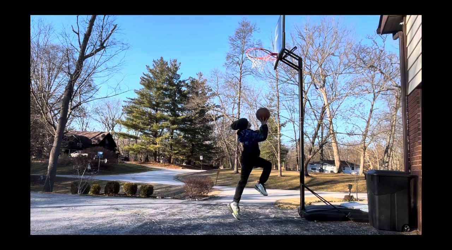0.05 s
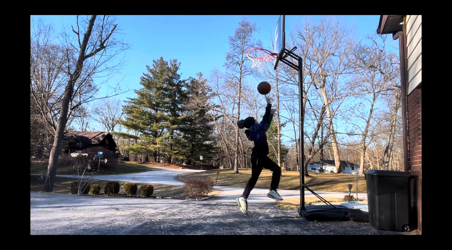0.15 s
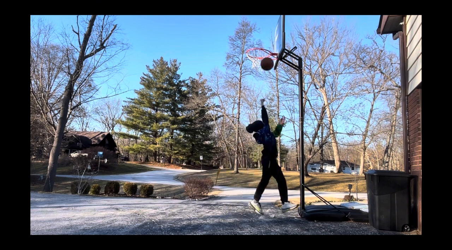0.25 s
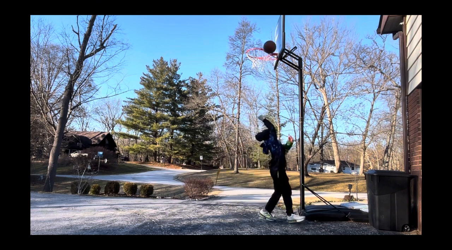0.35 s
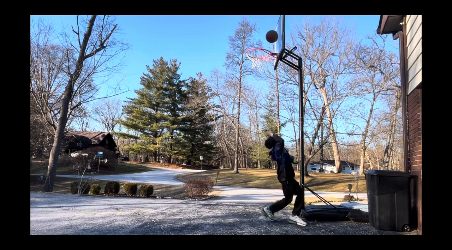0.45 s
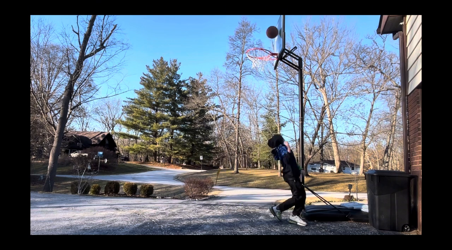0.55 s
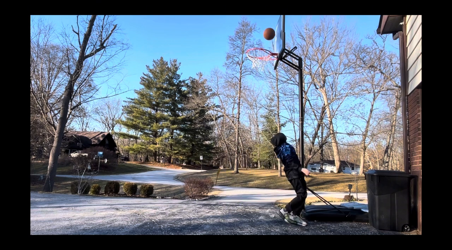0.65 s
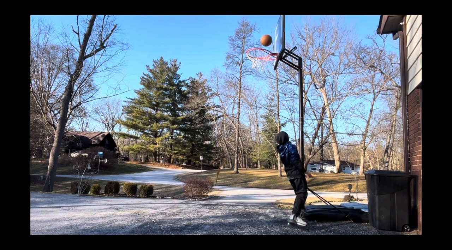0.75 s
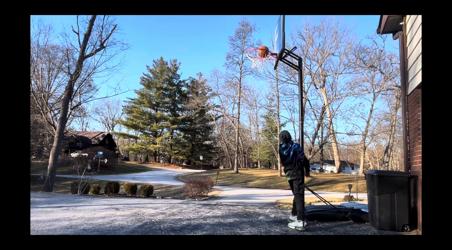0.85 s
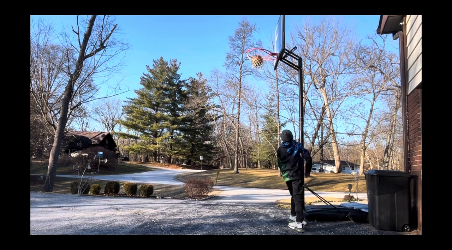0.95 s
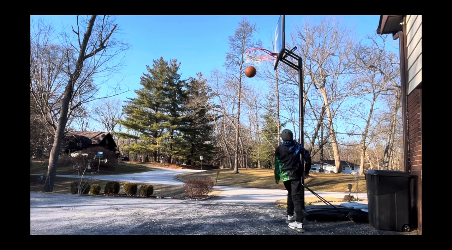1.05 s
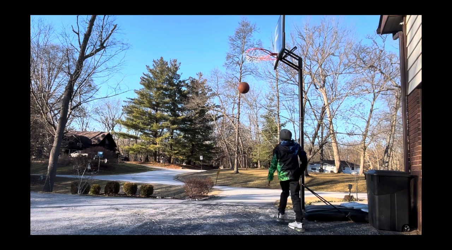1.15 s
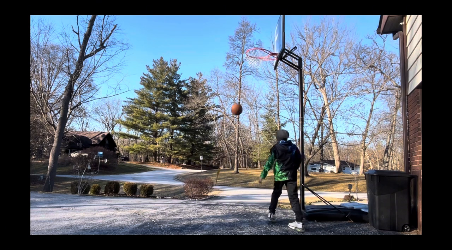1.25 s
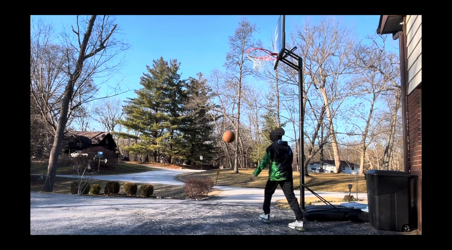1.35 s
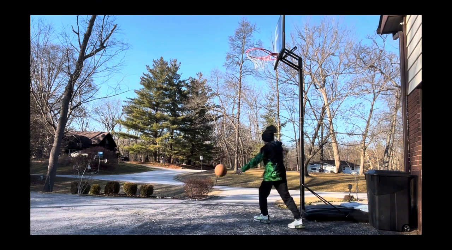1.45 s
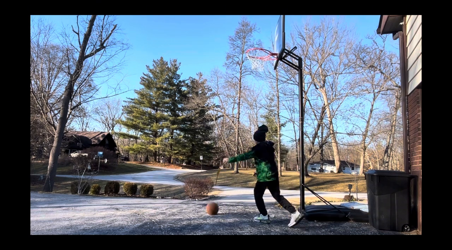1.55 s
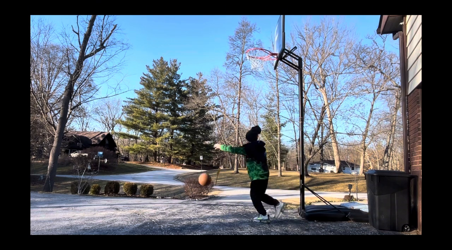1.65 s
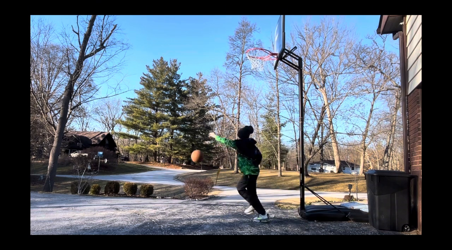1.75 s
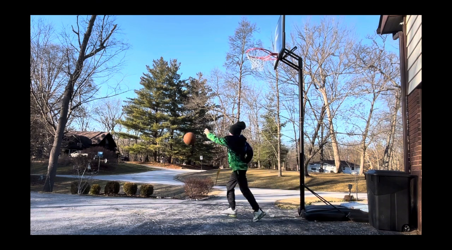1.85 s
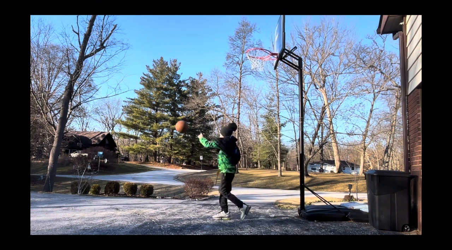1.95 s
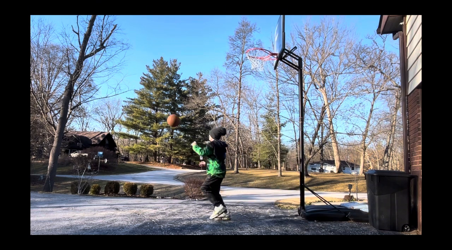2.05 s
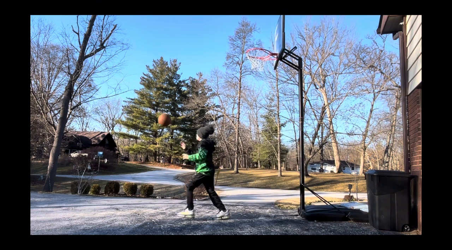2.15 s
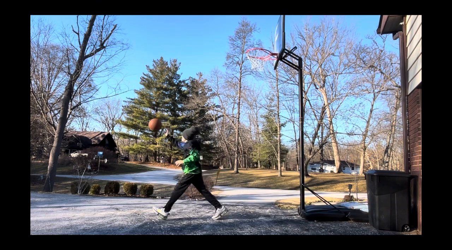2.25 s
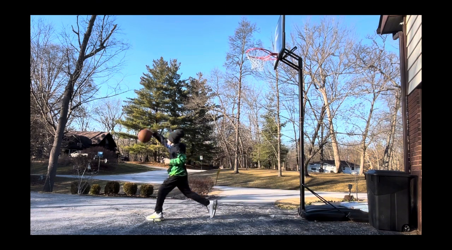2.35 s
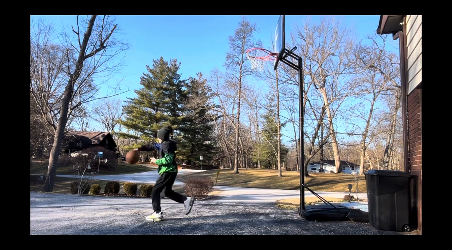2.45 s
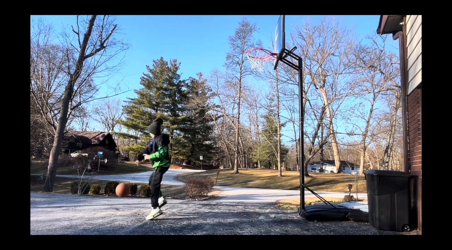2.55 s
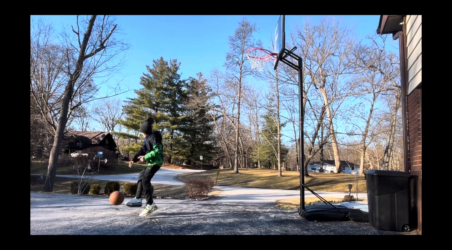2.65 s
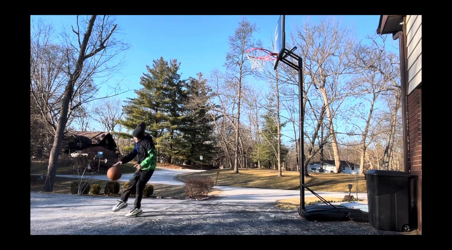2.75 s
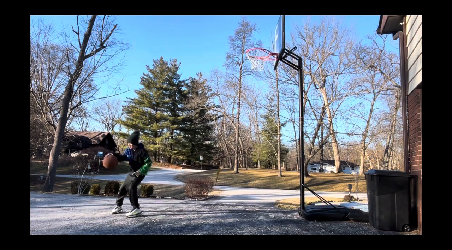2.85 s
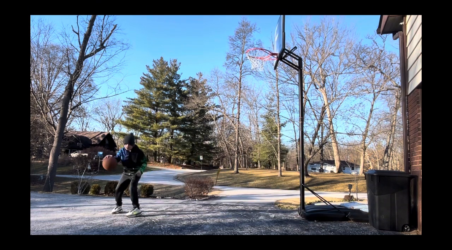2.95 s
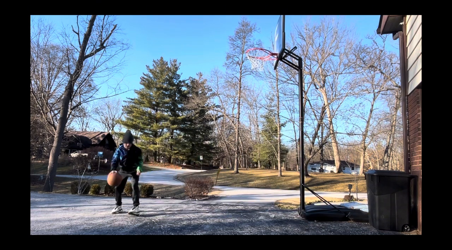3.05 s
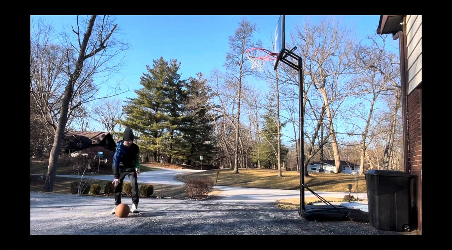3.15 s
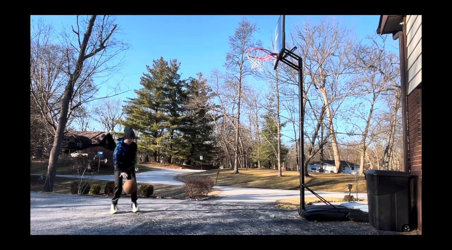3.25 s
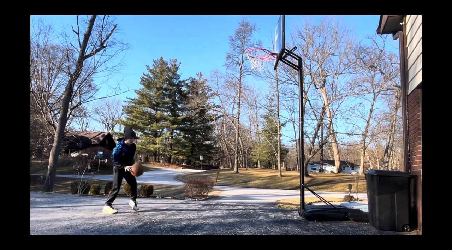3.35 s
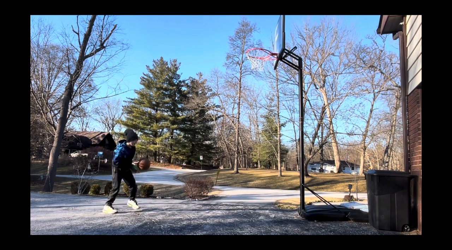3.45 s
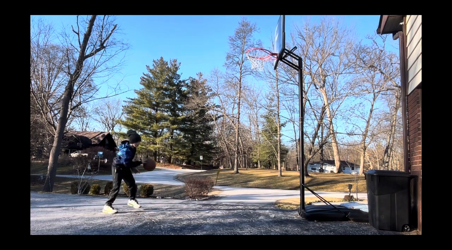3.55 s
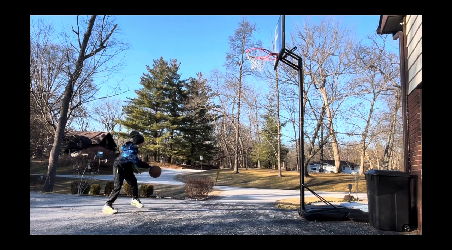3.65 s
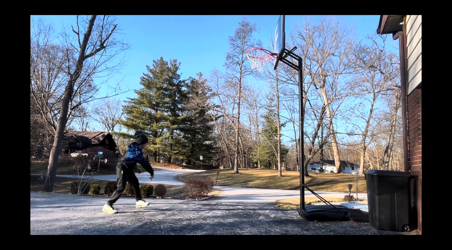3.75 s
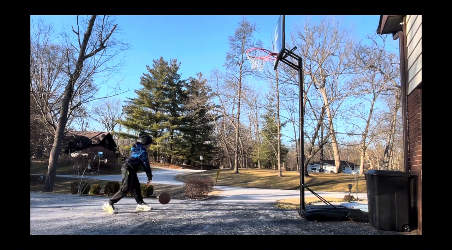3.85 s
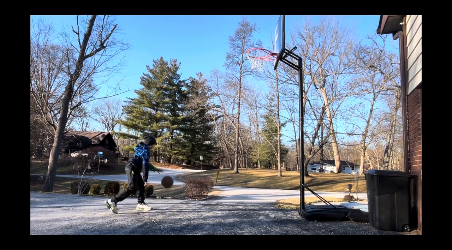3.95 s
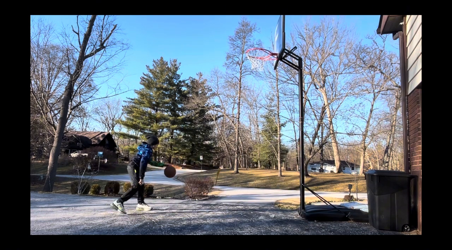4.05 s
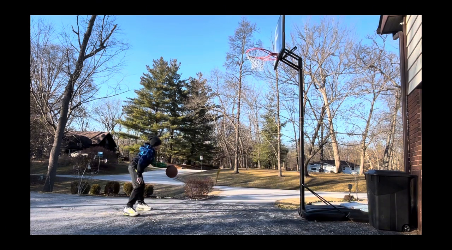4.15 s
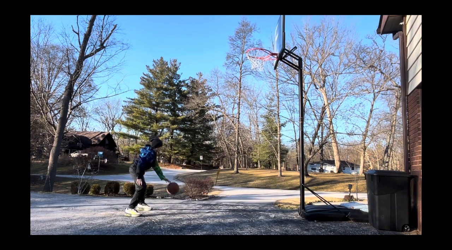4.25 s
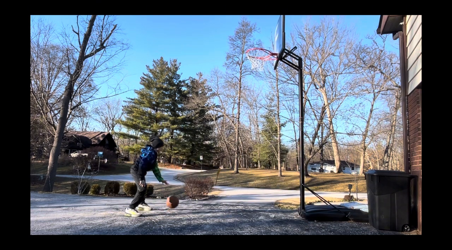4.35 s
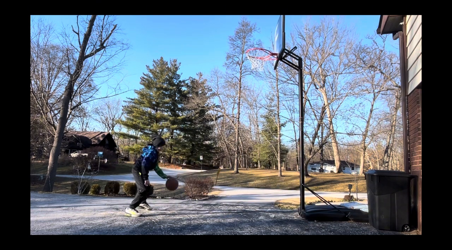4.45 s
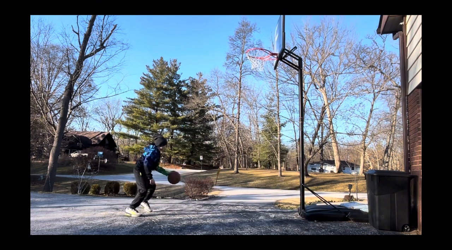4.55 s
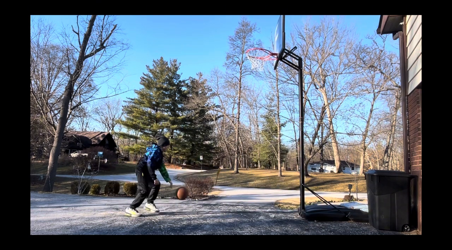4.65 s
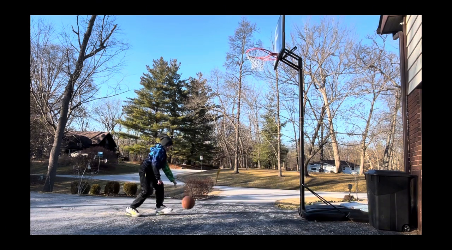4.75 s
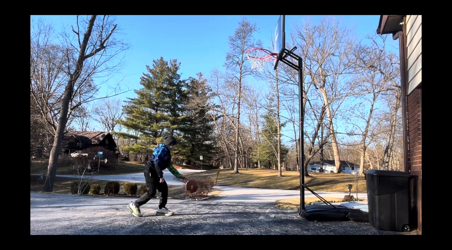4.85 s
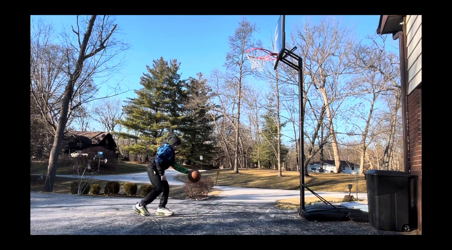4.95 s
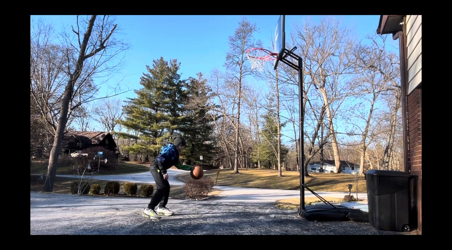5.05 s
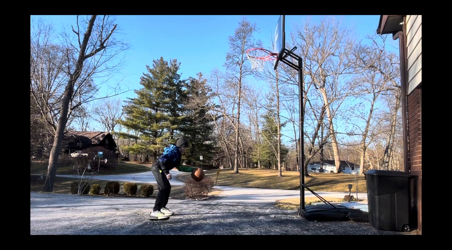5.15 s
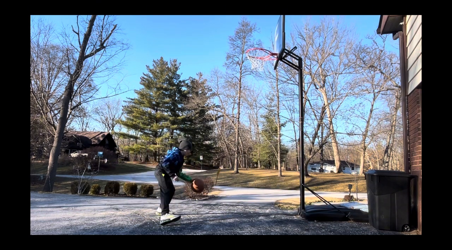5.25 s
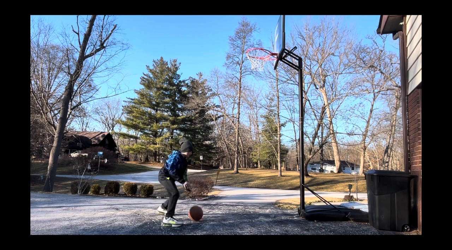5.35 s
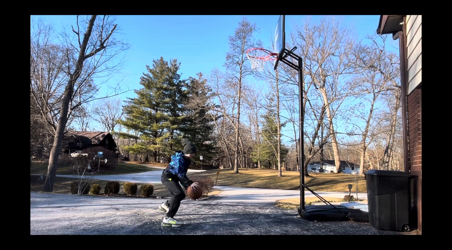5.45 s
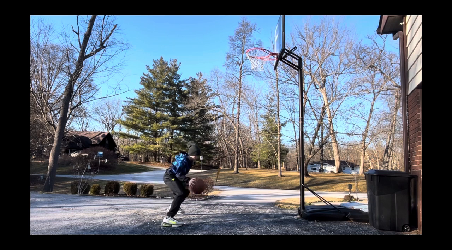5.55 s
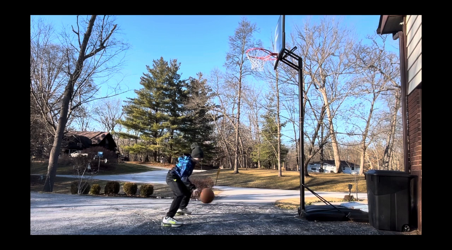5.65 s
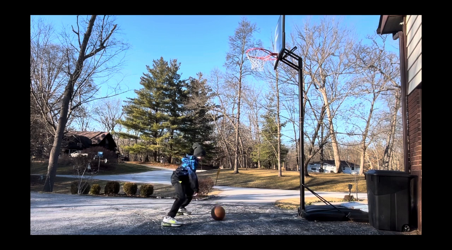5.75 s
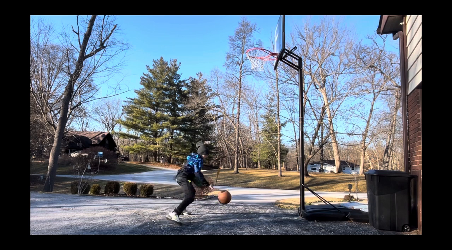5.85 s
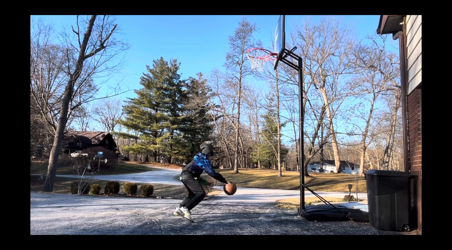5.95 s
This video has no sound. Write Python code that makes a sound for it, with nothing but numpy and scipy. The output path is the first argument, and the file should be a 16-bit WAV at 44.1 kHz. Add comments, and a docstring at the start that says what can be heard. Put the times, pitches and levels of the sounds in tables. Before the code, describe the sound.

A lone player in an open yard: quick footfalls and a heavy landing, a faint net rub with a low pole tremble, then eight hard basketball bounces on icy grit. The bounces vary from bright and cracking to duller, with short wall slap and a diffuse tail from the trees. Soft shoe scuffs and cloth rustles come between. Heard from a fixed microphone at some distance, with quiet air and low fading rumble.

```python
"""On a frozen driveway beside a house, a child lands from a lay-up, fetches a basketball and dribbles it.
Each blow cracks on the icy crust and bends it: a dispersed thud whose highs arrive first, so its pitch falls.
The ball rings in damped modes; shoes step and scrape on grit as filtered noise bursts; a jacket rustles.
Net cords swish and squeak by friction, and a tug shakes the rim and the pole in broad resonances.
The house wall and the trees answer as decaying noise, over open air and a low rumble that slowly recedes."""
import sys
import numpy as np
from scipy import signal
from scipy.fft import rfft, irfft
from scipy.io import wavfile

SR = 44100
rng = np.random.default_rng(int(sys.argv[2]) if len(sys.argv) > 2 else 0)


def master(y):
    """Save y as 16-bit WAV."""
    cut = np.clip(np.atleast_2d(y).T, -1, 1)
    pcm = np.round(cut * 32767)  # scale
    wavfile.write(sys.argv[1], SR, pcm.astype(np.int16))


N = 265041
TIME = np.arange(N) / SR  # s
BLOW_TIME = TIME[:24576]  # s, the span of one short event and its echoes


def undb(db):
    """Logarithmic level: decibels to amplitude gain."""
    return 10 ** (np.asarray(db) / 20)


def unit(x):
    """Normalization: scale to rms 1."""
    return x / np.sqrt(np.mean(x ** 2))


def curve(rows, at):
    """Linear interpolation through a table's points."""
    rows = np.array(rows)
    return np.interp(at, rows[:, 0], rows[:, 1])


def by_pitch(rows, hz):
    """Logarithmic pitch: interpolate every column of a table on a log frequency axis."""
    table_hz, *columns = np.transpose(rows)
    log_hz = np.log(np.maximum(hz, 1))
    return [np.interp(log_hz, np.log(table_hz), column) for column in columns]


def colour(x, rows):
    """Linear filtering: multiply the spectrum by a curve of (frequency [Hz], level [dB])."""
    gain = undb(by_pitch(rows, np.fft.rfftfreq(len(x), 1 / SR))[0])
    return irfft(rfft(x) * gain, len(x))


def click(rows, size=1024):
    """Minimum phase: the sharpest causal pulse with this spectrum, peak 1."""
    gain = undb(by_pitch(rows, np.fft.rfftfreq(size, 1 / SR))[0])
    cepstrum = irfft(np.log(gain))
    # folding the cepstrum onto positive times makes the pulse causal
    pulse = irfft(np.exp(rfft(2 * cepstrum[:size // 2], size) - cepstrum[0]))
    return pulse / np.abs(pulse).max()


def resonate(x, hz, width_hz):
    """Simple resonance: one peak with gain 1 at its centre."""
    return signal.lfilter(*signal.iirpeak(hz, hz / width_hz, fs=SR), x)


def grains(count, spread_db):
    """Granular noise: independent grains of very unequal size."""
    size, sign = rng.standard_normal((2, count))
    return sign * undb(spread_db * np.clip(size, -2, 2))


def surge(peak_s, rise_s, fall_s):
    """Exponential growth and decay: an envelope that rises to 1 and dies away."""
    age = TIME - peak_s
    return np.exp(-np.abs(age) / np.where(age < 0, rise_s, fall_s))


# where the player is: (time [s], lead of the left microphone [ms])
PLAYER_PLACE = [(0, -0.0093), (1.2, -0.17), (1.6, 0.029), (2.95, 0.2), (3.8, 0.085), (6, -0.038)]


def add(out, s, sound):
    """Interaural delay: place a sound at its time, reaching the nearer microphone first."""
    lead_s = curve(PLAYER_PLACE, s) / 1000
    stereo = np.broadcast_to(sound, (2, sound.shape[-1]))
    for channel, start_s, part in zip(out, (s - lead_s / 2, s + lead_s / 2), stereo):
        i = max(int(round(start_s * SR)), 0)
        channel[i:i + len(part)] += part[:N - i]


def player():
    """Superposition: bounces, landings, steps and scuffs add up, each with echoes of its own."""
    out = np.zeros((2, N))
    sources = ((bounce, BOUNCES), (landing, LANDINGS), (step, STEPS), (scuff, SCUFFS))
    for source, table in sources:
        for s, *row in table:
            add(out, s, source(*row))
    return out


# ball on the ground; the crust differs from spot to spot:
# (time [s], thud level [dB], thud start [Hz], crack level [dB], crunch level [dB], grit level [dB],
#  nominal crust ring [Hz], ring level [dB])
BOUNCES = [(1.5865, -6, 537, -5, -23, -11.5, 1536, -9.5), (2.6448, -6.5, 520, -10, -28, -9.5, 1894, -10),
           (3.1907, -7.5, 522, -9.5, -29.5, -15.5, 2727, -2.5),
           (3.8539, -12.5, 506, -13.5, -33.5, -16, 3060, -9),
           (4.3642, -8, 535, -14.5, -32, -12.5, 2520, -13.5),
           (4.7556, -12.5, 520, -13, -31.5, -21, 2376, -25.5),
           (5.3489, -5.5, 514, -24, -25, -17.5, 1535, -9.5), (5.755, -15.5, 800, -19, -34, -21, 2830, -29)]
BOUNCE_S = .018  # length of the thud


def bounce(thud_db, start_hz, *crust):
    """Impact: the ball strikes the crust, and both ring."""
    return blow(thud_db, start_hz, BOUNCE_S, *crust) + ball_ring(thud_db)


# spectrum of the crack: (frequency [Hz], level [dB])
CRACK_COLOUR = [(100, -13), (400, 8.5), (800, -4), (1500, 8.5), (2500, -11), (4500, 6), (7000, -7.5),
                (11000, -13), (15000, -33)]
# spectrum of the grit: (frequency [Hz], level [dB])
GRIT_COLOUR = [(200, 1.5), (700, -10.5), (1500, 6), (3000, 7), (5000, -6), (7000, -3), (11000, -10.5),
               (15000, -35.5)]
RING_SPREAD = .14  # share of the ring that goes sideways


def blow(thud_db, start_hz, length_s, crack_db, crunch_db, grit_db, ring_hz, ring_db, edge=0.13):
    """Dispersion of bending waves in the crust: a crack, a short ring, crushed grit and a falling thud."""
    t = BLOW_TIME
    # bending waves are slower the lower they are: the pitch falls as 1 / (1 + t / glide_s)
    glide_s = 0.00389
    phase = 2 * np.pi * start_hz * glide_s * np.log(1 + t / glide_s)
    age = t / length_s
    swell = (0.092 + age) / (1 + age ** 6.0)
    thud = swell * (np.sin(phase) - 0.044 * np.cos(2 * phase))
    # the ring sags for the same reason, starting 13 % above its nominal pitch
    sag_s = 0.0084
    ring_phase = 2 * np.pi * ring_hz * 1.13 * sag_s * np.log(1 + t / sag_s)
    ring_envelope = np.exp(-t / 0.002) * (1 - np.exp(-t / 0.00017))
    ring = undb(ring_db) * np.sin(ring_phase) * ring_envelope
    # the crust crunches while it is pressed
    crunch = unit(resonate(grains(len(t), spread_db=6), 650, 510)) / (1 + (age / 0.57) ** 2.9)
    # grit bursts at the first touch, then follows the thud
    grit_envelope = np.exp(-t / 0.0013) + 0.047 * swell
    grit = unit(colour(rng.standard_normal(len(t)), GRIT_COLOUR)) * grit_envelope
    crack = click(CRACK_COLOUR)
    crack = np.pad(crack, (0, len(t) - len(crack)))
    sound = undb(thud_db) * thud + undb(crunch_db) * crunch + undb(grit_db) * grit - undb(crack_db) * crack
    # the ring is beamed: sideways, into the yard, it is little more than a click
    sideways = RING_SPREAD * ring - edge * undb(ring_db) * crack
    return sound + ring + yard(sound + sideways)


def modes(rows, detune, spread_db):
    """Modal synthesis: exponentially fading sines, a little different at each bounce."""
    t = BLOW_TIME
    chance = rng.standard_normal((len(rows), 2))
    total = 0
    for (hz, db, t60_s), (level_chance, pitch_chance) in zip(rows, chance):
        tone = np.sin(2 * np.pi * hz * (1 + detune * pitch_chance) * t)
        fade = np.exp(-np.log(1000) * t / t60_s)
        total = total + undb(db + spread_db * level_chance) * tone * fade
    return total


# the ball's rubber shell, before scatter: (frequency [Hz], level re thud [dB], decay by 60 dB [s])
SHELL_MODES = [(288.4, -11.5, .06), (420.4, -22, 0.037), (507, -26, 0.11), (886, -26.5, 0.011),
               (1123, -23.5, 0.063)]
# air inside the ball, before scatter: (frequency [Hz], level re ping [dB], decay by 60 dB [s])
BALL_AIR_MODES = [(1010, 5, 0.27), (1466, 15.5, 0.18), (1560, -24.5, .25), (2040, -3.5, 1), (2190, -14, 1),
                  (2940, -7, 1), (3430, -8.5, .55), (3500, -11.5, 0.79)]


def ball_ring(thud_db, ping_db=-53):
    """Normal modes: the dented shell wobbles briefly; the air inside pings on faintly."""
    onset = 1 - np.exp(-BLOW_TIME / 0.0026)
    shell = undb(thud_db) * modes(SHELL_MODES, detune=0.028, spread_db=4.5) * onset
    echoed_shell = shell + yard(shell)
    # the ping grows half as fast, in decibels, as the thud
    return echoed_shell + undb(ping_db + thud_db / 2) * modes(BALL_AIR_MODES, detune=0.0015, spread_db=1)


# the player's full weight coming down, before the sole muffles it:
# (time [s], thud level [dB], thud start [Hz])
LANDINGS = [(0.41, -12.5, 678), (2.3531, -26, 872)]
LANDING_S, LANDING_RING_HZ = 0.012, 1200  # length of the thud, nominal pitch of the crust's ring
# the soft sole crunches and hardly cracks: levels relative to the thud
LANDING_CRACK_DB, LANDING_CRUNCH_DB, LANDING_GRIT_DB, LANDING_RING_DB = -37, -9, -11.5, -3.5
SOLE_HZ = 3300  # rubber muffles a landing above this


def landing(db, start_hz):
    """Low-pass impact: a shoe strikes the crust, all parts scale with the blow, and the sole muffles the top."""
    sound = blow(db, start_hz, LANDING_S, db + LANDING_CRACK_DB, db + LANDING_CRUNCH_DB,
                 db + LANDING_GRIT_DB, LANDING_RING_HZ, db + LANDING_RING_DB)
    return signal.sosfilt(signal.butter(2, SOLE_HZ, fs=SR, output="sos"), sound)


# light footfalls, levels before the envelopes:
# (time [s], decay time [s], heel level [dB], heel pitch [Hz], grit level [dB])
STEPS = [(0.3455, .0034, -14, 300, -38), (0.3817, 0.0046, -18, 340, -34), (0.7308, .0037, -39.5, 290, -82),
         (0.907, .028, -47, 317, -75), (1.4263, .0031, -43, 507, -53), (1.956, .0075, -34.5, 390, -52),
         (2.809, .0084, -30.5, 431, -45), (2.887, 0.0057, -34.5, 280, -51), (3.837, .0056, -33, 460.5, -69),
         (5.311, 0.0098, -35.5, 467, -63), (5.433, .012, -33.5, 354, -45), (5.682, .0054, -39, 460, -64),
         (5.9553, .0075, -30, 410, -52)]
SLAP_HZ, SLAP_DB = 1300, -12  # slap of the sole: pitch, and level relative to the heel


def step(length_s, heel_db, heel_hz, grit_db):
    """Damped resonance: a dull heel, the slap of the sole and a little grit, with their echoes."""
    t = BLOW_TIME
    # a rubber sole is heavily damped, so its resonances are broad
    heel = resonate(rng.standard_normal(len(t)), heel_hz, .8 * heel_hz)
    heel = unit(resonate(heel, heel_hz, 1.3 * heel_hz))
    slap = resonate(grains(len(t), spread_db=4), SLAP_HZ, .9 * SLAP_HZ)
    slap = unit(resonate(slap, SLAP_HZ, 1.6 * SLAP_HZ))
    grit = unit(colour(grains(len(t), spread_db=10.0), GRIT_COLOUR))
    fade = np.exp(-t / length_s)
    touch = (1 - np.exp(-t / 0.00013)) * fade
    weight = (1 - np.exp(-t / 0.0035)) * fade
    sound = undb(heel_db) * heel * weight + (undb(heel_db + SLAP_DB) * slap + undb(grit_db) * grit) * touch
    return sound + yard(sound)


# soles scraping, hands brushing the ball, levels before the envelope:
# (time [s], length [s], body level [dB], hiss level [dB])
SCUFFS = [(0.167, 0.037, -67.5, -92), (0.345, .026, -46.5, -42.5), (.41, 0.023, -46, -47),
          (0.547, 0.033, -55.5, -68), (0.8227, 0.0064, -43.5, -75), (1.924, 0.012, -52, -49.5),
          (2.3, 0.011, -65, -65.5), (2.7617, 0.0088, -42, -48.5), (2.83, 0.033, -59.5, -59),
          (3.29, 0.067, -58, -57), (4.192, 0.03, -48.5, -47), (4.537, 0.0058, -49, -53),
          (5.263, 0.0048, -49, -67.5), (5.607, 0.041, -53.5, -59.5), (5.876, 0.067, -48, -42.5)]
# spectrum of rubbing hiss: (frequency [Hz], level [dB])
HISS_COLOUR = [(500, 3), (2000, -8), (4000, -2), (6500, -7.5), (9000, -6.5), (12500, -5), (15500, -19.5)]
SCUFF_HZ = 1350  # where the body of a scrape resonates
JUDDER_HZ, JUDDER = 57, 0.46  # a scrape sticks and slips: rate and depth (0 to 1)


def scuff(length_s, body_db, hiss_db):
    """Stick-slip friction: tiny slips swell and die with the pressure, with their echoes."""
    age = BLOW_TIME / length_s
    pressure = np.minimum(age / 0.17, 1) / (1 + age ** 5.8)
    body = resonate(grains(len(age), spread_db=6), SCUFF_HZ, SCUFF_HZ)
    body = unit(resonate(body, SCUFF_HZ, 2 * SCUFF_HZ))
    hiss = unit(colour(grains(len(age), spread_db=15.0), HISS_COLOUR))
    slips = 1 - JUDDER * np.cos(2 * np.pi * JUDDER_HZ * BLOW_TIME)
    sound = pressure * slips * (undb(body_db) * body + undb(hiss_db) * hiss)
    return sound + yard(sound)


# the jacket rustles at each big movement: (middle [s], half length [s], level [dB])
RUSTLES = [(0.044, 0.15, -71), (0.322, 0.062, -66.5), (1.561, 0.17, -68), (2.3, 0.067, -68.5),
           (2.48, 0.053, -73), (3.648, 0.2, -75), (5.306, 0.088, -60.5), (5.827, 0.17, -60.5)]
# spectrum of the cloth: (frequency [Hz], level [dB])
CLOTH_COLOUR = [(200, -2.5), (700, 6), (2000, -1.5), (4000, -10), (7000, -24.5), (12000, -11), (15000, -22)]


def jacket():
    """Amplitude-modulated friction noise: creases rub, swelling and fading with each movement."""
    motion = sum(undb(db) * np.exp(-((TIME - s) / half_s) ** 2) for s, half_s, db in RUSTLES)
    sound = unit(colour(grains(N, spread_db=6), CLOTH_COLOUR)) * motion
    return sound + yard(sound)


# rim and pole resonances: (frequency [Hz], width of the first of two filters [Hz], relative level [dB])
HOOP_MODES = [(72.6, 36, 9.5), (129, 28, -2.5), (250, 120, -17.5)]
# the ball sinks into the net, rubs harder and harder and slips out: tightest moment, level, rise, fall
NET_S, NET_DB, NET_RISE_S, NET_FALL_S = 1.038, -53.5, 0.043, 0.011
# the tug on the hoop: moment, level, build-up and quick settling
TUG_S, TUG_DB, TUG_RISE_S, TUG_FALL_S = 0.992, -39.5, 0.041, .07
POLE_DB, POLE_T60_S = -1, 2  # the pole rings on: level relative to the tug, decay by 60 dB


def hoop(cord_hz=1400, cord_width_hz=800, hiss_db=-15, squeak_hz=1340, squeak_width_hz=70, squeak_db=0):
    """Friction and forced resonance: cords rub and squeak on the ball; the tug shakes rim and pole."""
    cords = resonate(grains(N, spread_db=10.0), cord_hz, cord_width_hz)
    cords = unit(resonate(cords, cord_hz, 3 * cord_width_hz))
    cords = cords + undb(hiss_db) * unit(colour(grains(N, spread_db=11.0), HISS_COLOUR))
    shudder = 0
    for hz, width_hz, db in HOOP_MODES:
        mode = resonate(rng.standard_normal(N), hz, width_hz)
        shudder = shudder + undb(db) * resonate(mode, hz, 2 * width_hz)
    shudder = unit(shudder)
    rub = surge(NET_S, NET_RISE_S, NET_FALL_S)
    pole = undb(POLE_DB) * surge(TUG_S, TUG_RISE_S, POLE_T60_S / np.log(1000))
    shake = surge(TUG_S, TUG_RISE_S, TUG_FALL_S) + pole
    squeak = resonate(cords, squeak_hz, squeak_width_hz)
    squeak = unit(resonate(squeak, squeak_hz, 2 * squeak_width_hz))
    # the squeak follows the rub squared, so it favours the tightest moment
    net = undb(NET_DB) * rub * (cords + undb(squeak_db) * rub * squeak)
    sound = net + undb(TUG_DB) * shake * shudder
    return sound + yard(sound)


# scatter from the house and the trees: (frequency [Hz], wall level [dB], trees level [dB],
#  trees' decay by 60 dB [s], left-right likeness [-1 to 1])
YARD_BANDS = [(60, -25.5, -17, 0.68, 1), (131.4, -25, -16.5, 0.79, 0.59), (253, -9.5, -11, .5, 0.96),
              (556, 2.5, -10.5, 0.72, -0.32), (1380, -7.5, -14, 1, -.35), (3050, -7, -12.5, 0.8, -0.33),
              (4650, -7, -12, .55, -0.017), (8100, -13, -23, 0.5, -0.32), (14000, -8, -16.5, 0.81, 1)]


def yard(dry, wall_s=0.0082, wall_decay_s=0.014, trees_s=0.016, echo_s=.08, echo_width_s=0.0067, echo=0.87):
    """Diffuse reflection: wall and bins return a quick cluster, trees a long tail with one far echo in it."""
    t = BLOW_TIME
    centres = np.array(YARD_BANDS)[:, 0]
    # overlapping bands that add up to the whole spectrum
    shares = by_pitch(np.c_[centres, np.eye(len(YARD_BANDS))], np.fft.rfftfreq(len(t), 1 / SR))
    noise = rfft(rng.standard_normal((2, len(t))))
    wall = (t > wall_s) * np.exp(-np.abs(t - wall_s) / wall_decay_s)
    far = (t > trees_s) * (1 + echo * np.exp(-((t - echo_s) / echo_width_s) ** 2))
    response = 0
    for share, (_, wall_db, trees_db, t60_s, likeness) in zip(shares, YARD_BANDS):
        mid, side = irfft(noise * share)
        likeness = np.clip(likeness, -1, 1)
        opposed = np.array([side, -side])
        scatter = np.sqrt((1 + likeness) / 2) * mid + np.sqrt((1 - likeness) / 2) * opposed
        trees = far * np.exp(-np.log(1000) * t / t60_s)
        power = (undb(wall_db) * unit(wall)) ** 2 + (undb(trees_db) * unit(trees)) ** 2
        response = response + scatter * np.sqrt(power / len(t))
    return signal.fftconvolve(dry[None], response, axes=1)[:, :len(dry)]


# spectrum of the open air: (frequency [Hz], level [dB])
AIR_COLOUR = [(15, -30.5), (25, -5), (54, -17.5), (86, 6.5), (335, -19.5), (501, -19.5), (655, -32.5),
              (856, -29.5), (2130, -36.5), (2500, -44), (6900, -51), (8320, -67), (10000, -56),
              (12400, -52), (15000, -73.5)]
# level of the air's middle part; level of the distant rumble at the start, and how fast it recedes
AIR_DB, RUMBLE_DB, RUMBLE_FADE_DB_PER_S = -55.5, -48, 1.65


def outdoors(side_db=-3, rumble_hz=64, rumble_width_hz=18):
    """Partly coherent noise: faint air, wide in the treble, and a distant rumble alike on both sides."""
    mid, side, low = rng.standard_normal((3, N))
    side = signal.sosfilt(signal.butter(1, 350, "high", fs=SR, output="sos"), unit(colour(side, AIR_COLOUR)))
    air = unit(colour(mid, AIR_COLOUR)) + undb(side_db) * np.array([side, -side])
    rumble = resonate(low, rumble_hz, rumble_width_hz)
    rumble = unit(resonate(rumble, rumble_hz, 2 * rumble_width_hz))
    return undb(AIR_DB) * air + undb(RUMBLE_DB - RUMBLE_FADE_DB_PER_S * TIME) * rumble


def scene():
    """Superposition: player, jacket, hoop and the background."""
    return player() + jacket() + hoop() + outdoors()


LEFT_DB = -1.1  # left level relative to right
CEILING = .72  # amplitude that rounded peaks approach, before the last two filters
TOP_HZ = 16000  # upper edge of the pass band


def record(dry, low_hz=34, dip_hz=8400, dip_width_hz=1500, treble_hz=13300):
    """Band limiting and saturation: the phone is weaker on the left, notches the treble and rounds peaks."""
    notched = dry - resonate(dry, dip_hz, dip_width_hz)
    heard = notched * undb([[LEFT_DB / 2], [-LEFT_DB / 2]])
    heard = signal.sosfilt(signal.butter(2, low_hz, "high", fs=SR, output="sos"), heard)
    heard = heard / (1 + (heard / CEILING) ** 6) ** (1 / 6)
    heard = signal.sosfilt(signal.butter(6, treble_hz, fs=SR, output="sos"), heard)
    return signal.sosfilt(signal.ellip(8, .2, 70, TOP_HZ, fs=SR, output="sos"), heard)


dry = scene()
out = record(dry)
master(out)
```